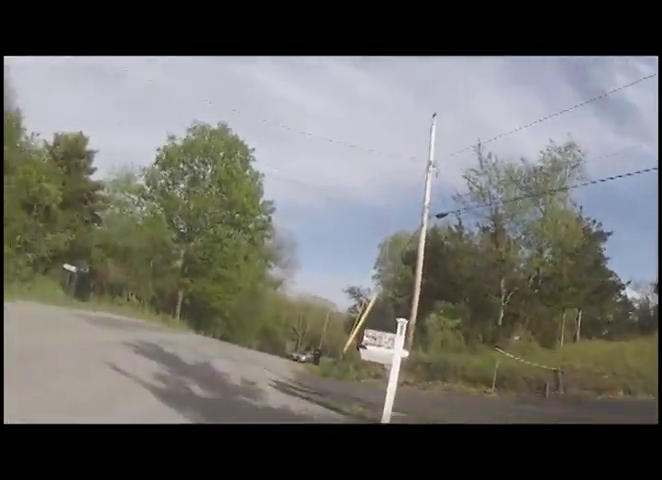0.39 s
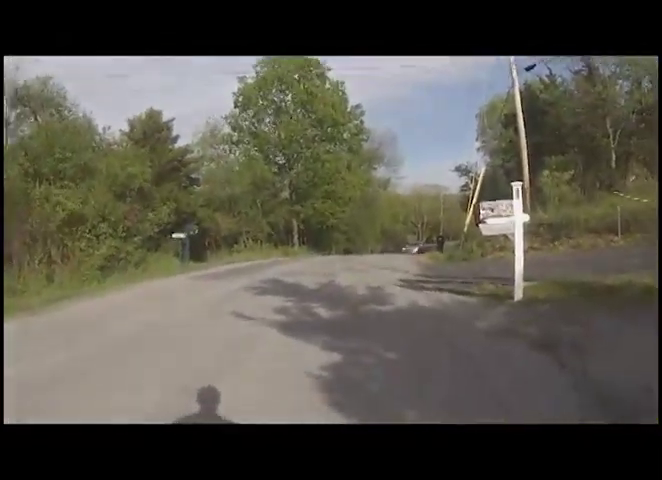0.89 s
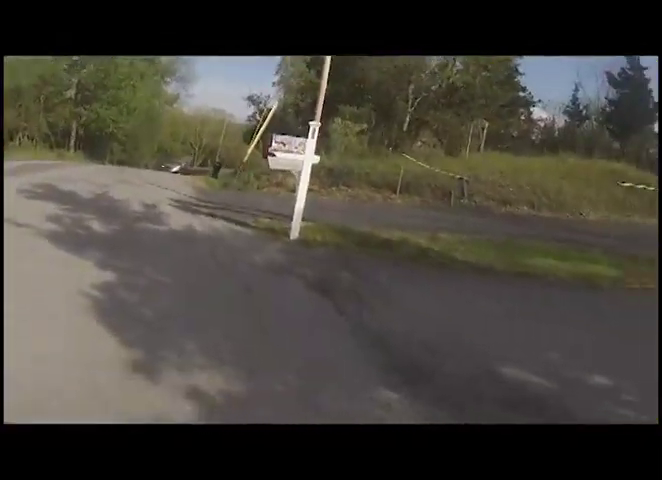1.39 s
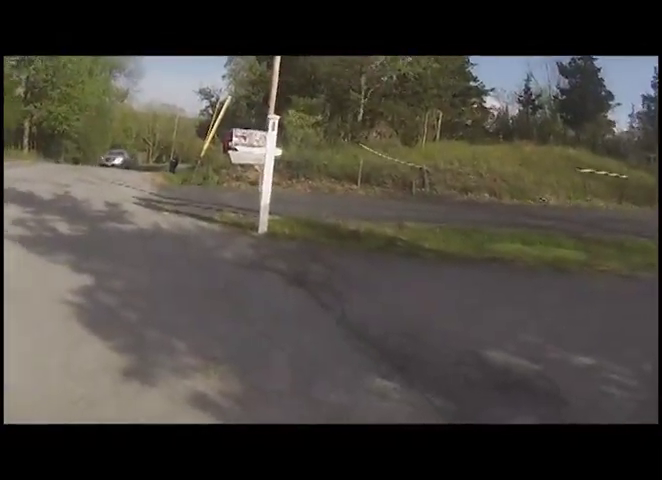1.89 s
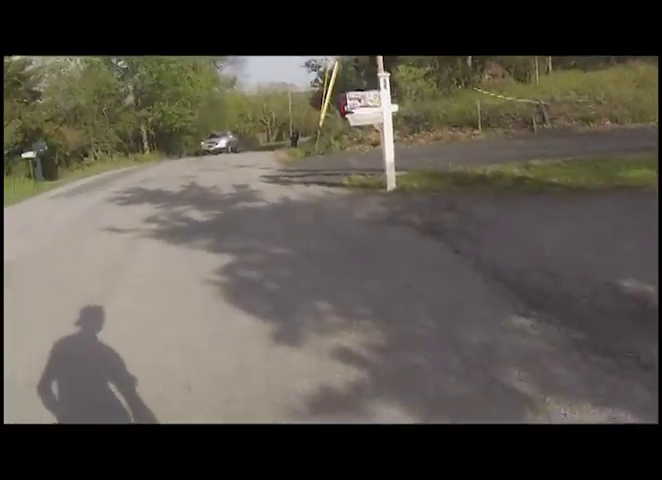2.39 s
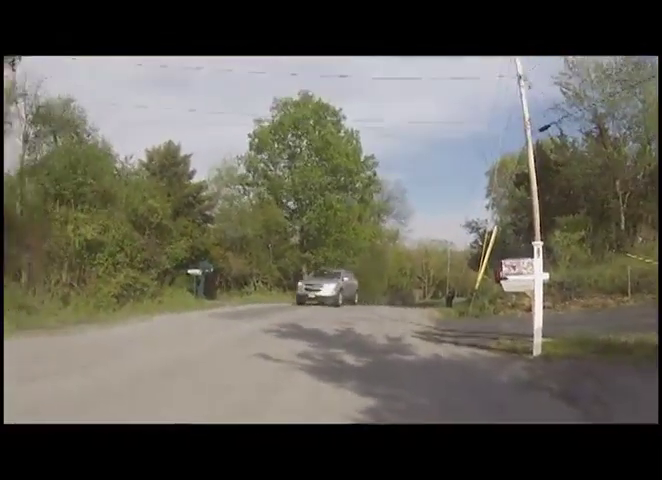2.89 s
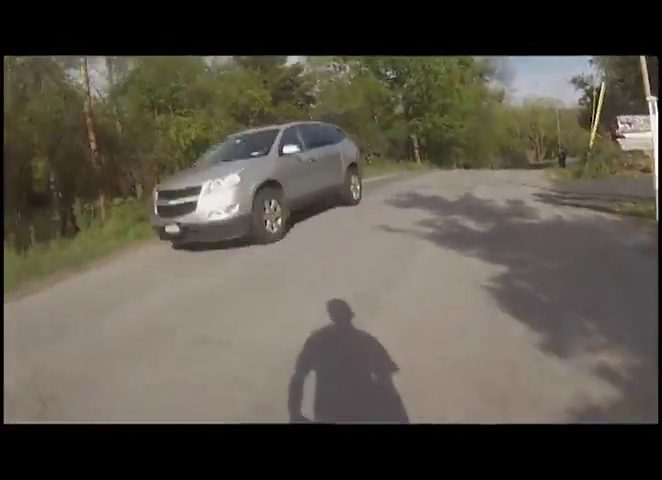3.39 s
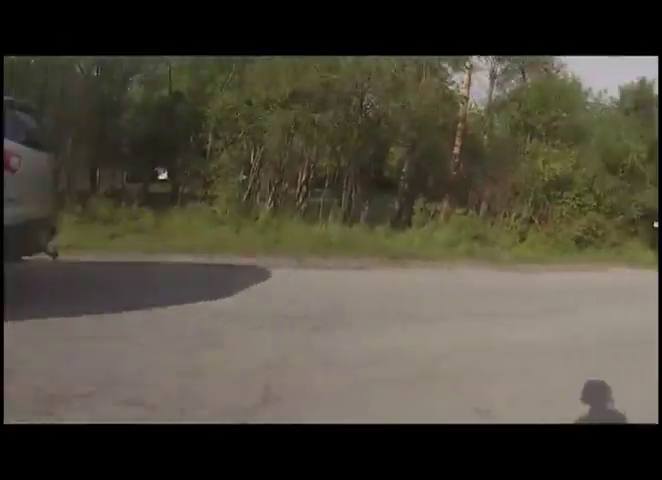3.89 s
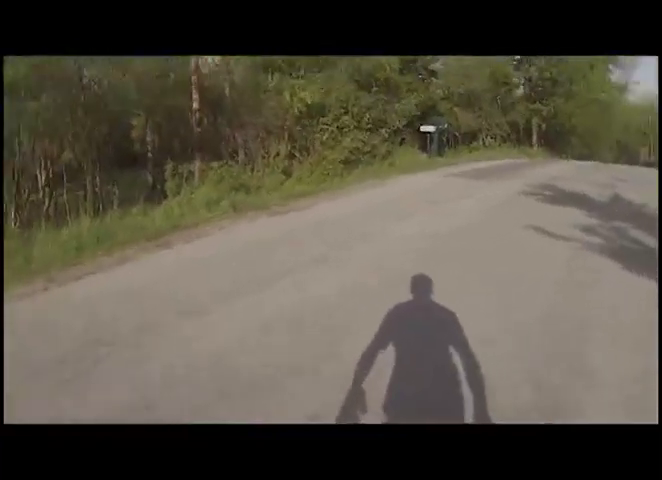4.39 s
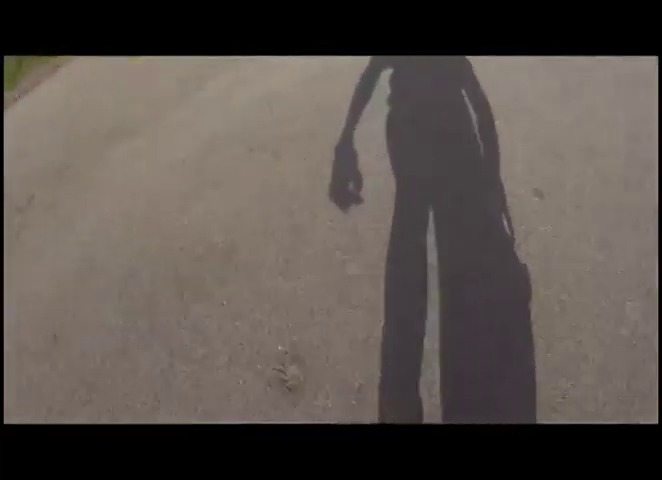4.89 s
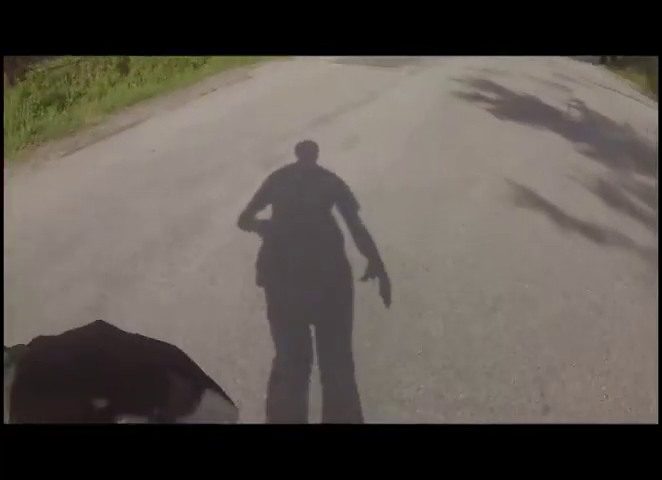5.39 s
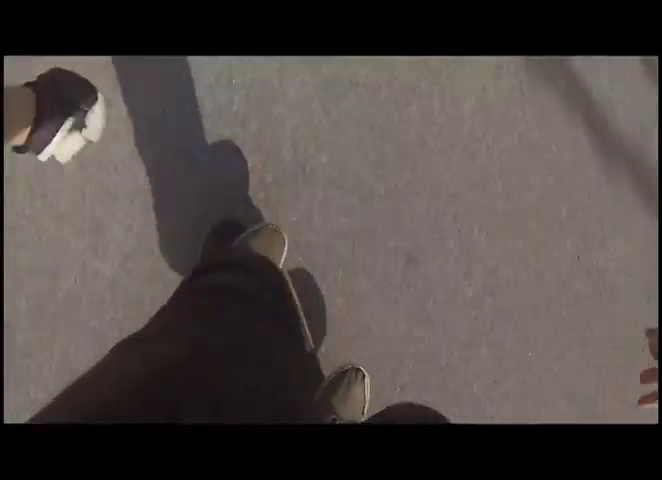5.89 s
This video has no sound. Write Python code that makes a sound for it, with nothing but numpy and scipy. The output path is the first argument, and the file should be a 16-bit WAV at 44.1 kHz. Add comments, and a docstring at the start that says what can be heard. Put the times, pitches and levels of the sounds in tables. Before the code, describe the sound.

Close, rough sound from a small camera in a hard case on a helmet outdoors. Low jolts and rubs come first, then soft regular footfall thuds with small plastic ticks and one sharp loud knock. Everything speeds up and rises in pitch as a car hisses by, a click marks the return to normal pace, then heavy booming jolts, clatter and strap rub finish over faint hiss.

```python
"""Open road: a small camera in a hard case on a skater's helmet.
Footfalls and head moves throw the mount and ring the helmet; knocks ring modes of the case.
Strap rub, road and a passing car's hiss are noise through resonances; scrapes stir them and slips squeak.
Electronics buzz in short tick trains over microphone hiss; a thin far whistle chirps twice.
While the car passes, playback runs fast, which lifts every pitch; a click marks each change of speed."""
import sys
import numpy as np
from scipy import signal
from scipy.fft import rfft, irfft
from scipy.io import wavfile
from scipy.ndimage import uniform_filter1d

SR = 44100
rng = np.random.default_rng(int(sys.argv[2]) if len(sys.argv) > 2 else 0)


def persist_wave(psi):
    """Save psi, clipped to +-1, as 16-bit WAV."""
    counts = np.round(np.clip(psi, -1, 1) * 32767).astype(np.int16)
    wavfile.write(sys.argv[1], SR, np.atleast_2d(counts).T)


def how_loud(loudness_db):
    """Turn decibels into a plain amplitude multiplier (0 dB gives 1, 20 dB gives 10)."""
    steps = np.asarray(loudness_db, float) / 20
    return 10 ** steps


N = 265242

FAST_FROM_S, FAST_TO_S, SPEED = 2.664, 3.827, 2.3
GAIN_S = (FAST_TO_S - FAST_FROM_S) * (SPEED - 1)
LONG = N + int(GAIN_S * SR)  # samples at real pace

# Event times in the tables are as heard.
# Footfalls. Each row: heel strike in seconds, peak level in dB, rocking relative to it in dB.
FOOTFALLS = [(0.492, -31, -4.5), (0.897, -27.5, -2), (1.303, -28, -1), (1.711, -26, -2.5),
             (2.115, -31.5, -2), (2.521, -29.5, -1.5), (2.773, -24, -5.5), (2.948, -24.5, -3.5),
             (3.126, -26, -4), (3.3, -31, -1.5), (3.472, -27, -2.5), (3.643, -33.5, 7), (3.832, -24, -5),
             (4.236, -32.5, 7), (4.636, -28.5, 2.5)]
# Jolts from head moves and the hand. Each row: peak in seconds, peak level in dB, pitch at the peak as heard
# in Hz, direction +-1, helmet ring relative to the level in dB.
HEAD_JOLTS = [(0.019, -17.5, 45, 1, -14), (0.052, -22, 31, 1, -16), (0.072, -14.5, 89, -1, 4.5),
              (0.099, -17.5, 45, 1, -8.5), (0.284, -17, 28, 1, -14.5), (0.367, -22.5, 22.6, -1, -17),
              (0.509, -22, 54.7, 1, -29), (0.732, -29, 30, -1, -32), (0.838, -23, 21.3, -1, -16),
              (1.128, -35.5, 64, 1, -27), (1.497, -34, 35.7, -1, 4.5), (1.817, -36.5, 92, -1, -3),
              (1.937, -37, 71, -1, -3), (2.307, -33, 79, 1, -18), (3.653, -22, 81.5, 1, -9.5),
              (4.273, -24, 43, -1, -26), (4.468, -34, 30, -1, -25), (4.566, -34, 116, -1, -13),
              (4.674, -35.5, 38, -1, 4.5), (4.972, -20, 140, -1, -13), (5.013, -8, 115, 1, -14),
              (5.089, -10, 75, -1, -2.5), (5.266, 3.5, 96.5, 1, -34), (5.277, -2.5, 80, -1, -4),
              (5.297, -11.5, 57, 1, -5.5), (5.33, -18, 23, -1, -5), (5.444, -25, 109, -1, -30),
              (5.703, -24, 58, 1, -20), (5.784, -8, 65, -1, -17), (5.806, -8.5, 24.5, 1, -20)]
# Helmet modes. Each row: mean frequency in Hz, mean relative level in dB, t60 in seconds.
HELMET_MODES = [(114.4, -5, 0.14), (161.3, -14, 0.19), (246, -1.5, 0.043), (312, -11, 0.092)]
# Knocks on the case. Each row: start in seconds, peak level of the middle modes in dB, then thud,
# hollow ring and bright ring relative to it in dB.
CASE_KNOCKS = [(0.0218, -37, -1, -16, 7), (0.0415, -29.5, 6.5, -1, 3), (0.3207, -52.5, 0, -10, 4),
               (0.8264, -44.5, -1, -5, -20), (1.1199, -44, -3, -4, 5.5), (1.3399, -27, -5, -15, -1.5),
               (1.923, -38.5, -7.5, -10, 0.5), (2.1231, -7, -21.5, -17, -7.5), (2.155, -30, -6, -22, 1.5),
               (2.177, -39, 1, -2, -16), (2.2073, -37, -5, -9, 5.5), (2.2977, -43, -9, -13, 5.5),
               (2.386, -44.5, -14, -5, 2), (2.8324, -47, 2, -15, -2), (2.9302, -43.5, -8, -20, -9),
               (2.9874, -37, -4, -7.5, 1.5), (3.258, -36.5, -10, -6.5, 4.5), (4.3804, -50, -1, -15, -6),
               (4.564, -43.5, 0.5, -12, -18), (4.6463, -36, -10, -24, 2.5), (4.7264, -43.5, 0, -17, 5),
               (4.8738, -34, -7, -9, 4.5), (4.9702, -30.5, 5.5, -2, -8), (5.0034, -5.5, 2, -12, -2),
               (5.0111, -23, 8, -15, -22), (5.0811, -36.5, 12.5, -6, 0), (5.2671, -29.5, 3, -9, -1),
               (5.2884, -16, 0, -4, 5.5), (5.3025, -25.5, -13, 8.5, -2), (5.3489, -25.5, -4, -9, -5.5),
               (5.3648, -34, -5, 10, -5), (5.378, -31, -3, -9, -14), (5.4415, -48, -10, -6, -5)]
# Case modes. Each row: mean frequency in Hz, mean relative level in dB, t60 in seconds.
CASE_MODES = [(212.5, -11, 0.059), (288.6, -6.5, 0.056), (420, 4.5, 0.02), (525, 3.5, 0.058),
              (640.4, 3.5, 0.058), (897, -1, 0.025), (1080, -10, 0.015), (1230, 5.5, 0.019),
              (1503, 6, 0.033), (1705, -0.5, 0.023), (1850, -3, 0.009), (1996, 1.5, 0.022),
              (2220, -11.5, 0.042), (2380, -7.5, 0.021), (3240, 7, 0.0052), (3550, -1, 0.018),
              (4020, -1.5, 0.012), (4650, 1, 0.0084), (4810, 12.5, 0.002), (6700, -11, 0.0024),
              (7500, -0.5, 0.0062)]
# Softness of the contact as felt by each mode group, low to high, in samples.
CONTACT_SOFTNESS_SAMPLES = [60, 30, 14, 10, 5]
# Ring-up time constant of each mode group, low to high, in ms.
RING_UP_MS = [4.3, 0.8, 0.3, 0.57, 0.071]
# Head movement. Each row: time in seconds, sway of the mount in dB, creak of the mount in dB, strap rub in dB.
HEAD_MOVES = [(0.0, -15, -51, -47.5), (0.12, -32, -63, -55), (0.54, -46, -64.5, -61.5),
              (0.77, -30.5, -58, -54.5), (1.03, -47.5, -60.5, -66), (1.4, -41, -56.5, -62.5),
              (1.76, -45, -62, -59), (1.95, -53, -64.5, -65.5), (2.2, -36.5, -59, -52),
              (2.4, -43, -65, -76), (3.0, -45, -64, -64), (3.4, -45.5, -61, -58.5),
              (3.8, -38.5, -59.5, -52), (4.39, -38.5, -58.5, -63), (4.66, -39.5, -76, -62),
              (4.85, -36.5, -60, -53.5), (5.0, -25, -57, -38.5), (5.15, -21, -49, -46.5),
              (5.29, -44, -39, -42), (5.47, -32, -52, -62.5), (5.7, -25.5, -44, -43.5),
              (6.01, -31.5, -46, -56)]
# Strap or hand dragged over the case. Each row: start in seconds, length in seconds, level in dB,
# dull share in dB, bright share in dB.
DRAGS = [(0.017, 0.05, -38, -14, -4.5), (0.039, 0.033, -32, -1, -8.5), (0.082, 0.041, -55.5, -4, -9),
         (0.206, 0.062, -44, -16, -17), (0.31, 0.047, -60.5, 2, -2), (1.108, 0.063, -49.5, -19, -21),
         (1.391, 0.057, -53, -25, -13.5), (2.05, 0.075, -60, -9, -1), (2.76, .045, -55, -22, -19),
         (3.137, 0.025, -45.5, -9, -16), (3.162, 0.039, -40.5, -8, -21), (4.222, 0.17, -40, -12.5, -17),
         (4.381, 0.036, -40, -32, -17.5), (4.796, 0.059, -50, 5, -5), (4.87, 0.054, -51, 6, -22),
         (5.028, 0.019, -52, -4, -6), (5.08, 0.047, -48.5, -16, -6), (5.42, 0.055, -44.5, -10, -14),
         (5.702, 0.091, -44.5, -4.5, -6), (5.825, 0.02, -56.5, 12, 3.5), (5.943, 0.082, -45, -6, -13.5)]
# Mount sway resonances. Each row: frequency in Hz, nominal width in Hz, relative level in dB.
SWAY_PEAKS = [(20.56, 11.9, 10), (45, 44, -5.5), (82, 32, -16.5), (150, 89, -27.5)]
# Mount creak resonances. Each row: frequency in Hz, nominal width in Hz, relative level in dB.
CREAK_PEAKS = [(238, 194, 3), (292, 132, -1), (458, 126, -1), (680, 68, 5)]
# Road resonances. Each row: frequency in Hz, nominal width in Hz, relative level in dB.
ROAD_PEAKS = [(620, 580, -12.5), (980, 243, -3.5), (1268, 327, 5), (1410, 81, -1), (1910, 122, -5.5),
              (2620, 840, -17), (3130, 180, -13.5), (4930, 530, -33.5)]
# Strap rub resonances. Each row: frequency in Hz, nominal width in Hz, relative level in dB.
RUB_PEAKS = [(2076, 258, 17.5), (2462, 340, -1)]
# Cloth rustle resonances. Each row: frequency in Hz, nominal width in Hz, relative level in dB.
RUSTLE_PEAKS = [(3585, 560, 20), (4650, 1140, 15), (5900, 4500, -2), (7040, 400, -35), (12000, 4700, -34)]
# Strap slips. Each row: start in seconds, length in seconds, peak level in dB, then start, middle and end in Hz.
STRAP_SLIPS = [(5.504, 0.026, -51, 1450, 1540, 1520), (5.555, 0.081, -44, 1900, 1980, 1940)]
# Tyre hiss as the case passes it. Each row: frequency in Hz, nominal width in Hz, relative level in dB.
TYRE_HISS_PEAKS = [(720, 730, -9), (1240, 354, 0.5), (1451, 124, 5), (2022, 172, 3), (3070, 550, -15),
                   (4930, 2500, -25.5)]
# Far whistle. Each row: start in seconds, length as heard in seconds, peak level in dB.
WHISTLES = [(2.066, 0.1, -60), (3.06, .03, -61)]
# Microphone noise shape. Each row: frequency in Hz, relative level in dB per Hz.
MIC_NOISE = [(150, -17), (700, -3), (2100, -18), (2800, -12), (5200, -15), (7000, -16.5), (9000, -22.5),
             (11000, -18), (12300, -23), (14400, -32), (15300, -46), (20000, -62)]
# Clicks near the changes of speed. Each row: start in seconds, noise gain in dB.
SPEED_CLICKS = [(2.67, -42.5), (3.827, -34)]

STEP_HZ, STEP_HZ_SPREAD, STEP_RING_DB = 49.6, .15, -12  # pitch at real pace
STEP_PUSH_SAMPLES, JOLT_PUSH_SAMPLES = 380, 200  # softness of the push on the helmet
FADE_CYCLES = 0.32
MOUNT_HZ, MOUNT_T60_S, JOLT_ROCK_DB = 18.14, 0.33, -13.5  # slow rocking at real pace
CONTACT_MS, CONTACT_ROUGH = 0.72, 0.68
KNOCK_REF_DB, CRACK_DB, CRACK_PER_DB = -35, -6, -.5  # heavy blows are blunt and crack less
RATTLE_COUNT, RATTLE_MIN_DB, RATTLE_SPREAD_DB = 10, -56, 4
ROAD_UNDER_RUB_DB = -6
RUSTLE_DB, RUSTLE_SLOPE, RUB_REF_DB = -70, 0.97, -60
SWAY_FLICKER_DB, CREAK_FLICKER_DB, RUB_FLICKER_DB, RUSTLE_FLICKER_DB = 2, 2.2, 1.5, 1.5
CAR_PASS_S, CAR_NEAR_S, CAR_AWAY_S = 3.686, 0.61, 0.45  # pass as heard; own distance coming, going
CAR_HISS_DB, CAR_ROAR_DB = -41.5, -54  # when abreast
BUZZ_HZ, BUZZ_WIDTH_HZ, BUZZ_RATE_HZ = 10150, 1600, 450  # band, mean tick rate
BUZZ_FIRST_S, BUZZ_EVERY_S, BUZZ_REST_S = .0375, .1003, (2.1, 3.82)  # rest as heard
BUZZ_LATE_S, BUZZ_LATE_SHARE, BUZZ_TWICE_SHARE = 0.026, .3, 0.29
BUZZ_MEAN_MS, BUZZ_MAX_DB = 22, -50
WHISTLE_HZ, WHISTLE_HARMONICS_DB = 3260, [-3, -4, -6, -7]  # pitch at real pace
MIC_HISS_DB = -66
CEILING = .95


def real_s(s):
    """Time on the road for a moment as heard."""
    return s + np.interp(s, [FAST_FROM_S, FAST_TO_S], [0, GAIN_S])


def speed_at(s):
    """Playback speed at a moment as heard."""
    return SPEED if FAST_FROM_S < s < FAST_TO_S else 1


def level(x, db):
    """Scale to an rms level."""
    return x * how_loud(db) / np.sqrt(np.mean(x ** 2))


def add(out, s, x, peak_db):
    """Mix x in at a moment as heard, at a peak level."""
    i = int(real_s(s) * SR)
    x = x[:LONG - i]
    out[i:i + len(x)] += x * how_loud(peak_db) / np.max(np.abs(x))


def ring(modes, detune, length_s):
    """Decaying sines, slightly detuned and reweighted blow by blow."""
    f, db, t60 = np.transpose(modes)[:, :, None]
    t = np.arange(int(length_s * SR)) / SR
    chance = rng.standard_normal((2, len(modes), 1))
    decay = np.exp(-np.log(1000) * t / t60)
    return how_loud(db + 1.5 * chance[0]) * decay * np.sin(2 * np.pi * f * (1 + detune * chance[1]) * t)


def throw(out, s, db, hz, way, ring_db, rock_db, push_samples):
    """The mount swings to a sharp peak and back ever slower, rocks, and rings the helmet through a soft push."""
    t = np.arange(-.02 * SR, .25 * SR) / SR
    turns = hz * t / (1 + 26.0 * np.maximum(t, 0))
    size = np.where(t < 0, np.exp(-(turns / 0.29) ** 2), np.exp(-turns / FADE_CYCLES - t / 0.14))
    # stretched ahead of the fast playback, which restores its pace
    swing = signal.resample(np.cos(2 * np.pi * turns) * size, int(len(t) * speed_at(s)))
    swing = np.convolve(swing, np.hanning(81), "same")  # rounds the sharp peak
    after = t[t > 0]
    rock = np.sin(2 * np.pi * MOUNT_HZ * after) * np.exp(-np.log(1000) * after / MOUNT_T60_S)
    rock = rock * np.tanh(after / 0.014)
    helmet = signal.fftconvolve(ring(HELMET_MODES, 0.12, 0.11).sum(0), np.hanning(push_samples))
    add(out, max(s - .02, 0), np.sign(way) * swing, db)
    add(out, s, -np.sign(way) * rock, db + rock_db)
    add(out, max(s - .009, 0), helmet, db + ring_db)


def footfalls():
    """Each heel strike throws the mount downward at a slightly varying pitch."""
    out = np.zeros(LONG)
    for s, db, rock_db in FOOTFALLS:
        hz = STEP_HZ * (1 + STEP_HZ_SPREAD * rng.uniform(-0.41, 1)) * speed_at(s)
        throw(out, s, db, hz, -1, STEP_RING_DB, rock_db, STEP_PUSH_SAMPLES)
    return out


def head_jolts():
    """Head moves and the hand throw the mount either way, each at its own pitch."""
    out = np.zeros(LONG)
    for row in HEAD_JOLTS:
        throw(out, *row, JOLT_ROCK_DB, JOLT_PUSH_SAMPLES)
    return out


def strike(out, s, db, thud_db, hollow_db, bright_db):
    """A few ms of rough contact ring five groups of case modes, each with its own share."""
    crack_db = bright_db + CRACK_DB + CRACK_PER_DB * (db - KNOCK_REF_DB)
    t = np.arange(int(0.015 * SR)) / SR
    contact = CONTACT_ROUGH * rng.standard_normal(len(t)) * np.exp(-t * 1000 / CONTACT_MS) / 4
    contact[0] = 1  # a firm first touch, then chatter
    modes = ring(CASE_MODES, .02, .08)
    group = np.digitize(np.array(CASE_MODES)[:, 0], [500, 750, 1750, 2800])
    for k, share_db in enumerate([thud_db, hollow_db, 0, bright_db, crack_db]):
        push = np.convolve(contact, np.hanning(CONTACT_SOFTNESS_SAMPLES[k] + 2))
        members = modes[group == k]
        body = members[::2].sum(0) - members[1::2].sum(0)  # neighbours move in opposite senses
        body = body * (1 - np.exp(-np.arange(len(body)) * 1000 / SR / RING_UP_MS[k]))
        add(out, s, signal.fftconvolve(body, push), db + share_db)


def knocks():
    """Blows ring the case; where each lands sets the shares of its mode groups."""
    out = np.zeros(LONG)
    for row in CASE_KNOCKS:
        strike(out, *row)
    return out


def rattle():
    """Small loose ticks at random moments ring the same case modes."""
    out = np.zeros(LONG)
    for when, size, bright in rng.random((RATTLE_COUNT, 3)):
        db = RATTLE_MIN_DB + RATTLE_SPREAD_DB * size
        strike(out, when * (N / SR - .1), db, -8, -8, 12 * bright - 6)
    return out


def walk(rate_hz):
    """Random levels, a new one every 1 / rate_hz s, slewed in between."""
    k = int(SR / rate_hz)
    return 2.32 * uniform_filter1d(np.repeat(rng.standard_normal(LONG // k + 1), k), k)[:LONG]


def coloured(peaks, grit_db, flicker_db, rate_hz):
    """Grainy noise through resonances applied twice; they flicker together and a little apart."""
    grit = how_loud(grit_db * np.minimum(rng.exponential(size=LONG), 6.5))
    spectrum = rfft(rng.standard_normal(LONG) * grit)
    hz = np.fft.rfftfreq(LONG, 1 / SR) + 1e-9
    shared = walk(rate_hz)
    out = 0
    for f, width, db in peaks:
        shape = 1 / (1 + 1j * (hz / f - f / hz) * f / (1.485 * width)) ** 2
        flicker = 2 * np.tanh((shared + 0.47 * walk(rate_hz)) / 2)  # bounded
        out = out + how_loud(db + flicker_db * flicker) * irfft(spectrum * shape, LONG)
    return level(out, 0)


def drag(column):
    """Gain of the scrapes for one layer: each bites quickly, holds and lets go."""
    gain = np.zeros(LONG)
    for row in DRAGS:
        a = int(real_s(row[0]) * SR)
        b = min(int(real_s(row[0] + row[1]) * SR), LONG)
        share_db = row[column] if column else 0
        shape = np.interp(np.linspace(0, 1, b - a), [0, .12, .4, .8, 1], [0.46, 0.45, 1.07, 0.8, 0.047])
        gain[a:b] += how_loud(row[2] + share_db) * shape
    return uniform_filter1d(gain, size=60)


def rubbing():
    """Head movement drives mount, strap, road and cloth resonances; scrapes stir all but the sway."""
    s, *columns = np.transpose(HEAD_MOVES)
    t = np.arange(LONG) / SR
    sway_db, creak_db, rub_db = (np.interp(t, real_s(s), c) for c in columns)
    dull = drag(column=3)
    creak = how_loud(creak_db) + how_loud(-5.5) * dull
    road = how_loud(rub_db + ROAD_UNDER_RUB_DB) + dull
    rub = how_loud(rub_db) + drag(column=0)
    rustle = how_loud(RUSTLE_DB + RUSTLE_SLOPE * (rub_db - RUB_REF_DB)) + drag(column=4)
    out = how_loud(sway_db) * coloured(SWAY_PEAKS, 0, SWAY_FLICKER_DB, 8.6)
    out = out + creak * coloured(CREAK_PEAKS, 3.03, CREAK_FLICKER_DB, 25)
    out = out + road * coloured(ROAD_PEAKS, 0, 0.43, 10)
    out = out + rub * coloured(RUB_PEAKS, 1.2, RUB_FLICKER_DB, 40)
    return out + rustle * coloured(RUSTLE_PEAKS, 4.3, RUSTLE_FLICKER_DB, 35)


def squeaks():
    """The strap slips: a thin tone glides on a parabola through three pitches."""
    out = np.zeros(LONG)
    for s, length_s, db, *hz in STRAP_SLIPS:
        u = np.linspace(0, 1, int(length_s * SR))
        pitch = np.polyval(np.polyfit([0, .5, 1], hz, 2), u)
        add(out, s, np.sin(2 * np.pi * np.cumsum(pitch) / SR) * np.sin(np.pi * u), db)
    return out


def car():
    """Even tyre hiss and low roar swell and fall with distance, the roar more steeply."""
    since = np.arange(LONG) / SR - real_s(CAR_PASS_S)
    near = 1 / np.hypot(1, since / np.where(since < 0, CAR_NEAR_S, CAR_AWAY_S))
    hiss = how_loud(CAR_HISS_DB) * near ** 1.5 * coloured(TYRE_HISS_PEAKS, 0, 0.95, 25)
    roar = how_loud(CAR_ROAR_DB) * near ** 2.2 * coloured(CREAK_PEAKS, 0, 0.95, 25)
    return hiss + roar


def buzz():
    """Short irregular trains of electrical ticks in a high band, some late or doubled, with a rest."""
    out = np.zeros(LONG)
    ticks = (rng.random(LONG) < BUZZ_RATE_HZ / SR) * rng.standard_normal(LONG)
    band = [BUZZ_HZ - BUZZ_WIDTH_HZ / 2, BUZZ_HZ + BUZZ_WIDTH_HZ / 2]
    train = signal.sosfilt(signal.butter(3, band, "bandpass", fs=SR, output="sos"), ticks)
    clock = np.arange(BUZZ_FIRST_S, LONG / SR - .1, BUZZ_EVERY_S)
    for s, (late, twice, size, long) in zip(clock, rng.random((len(clock), 4))):
        if real_s(BUZZ_REST_S[0]) < s < real_s(BUZZ_REST_S[1]):
            continue
        starts = [BUZZ_LATE_S * (late < BUZZ_LATE_SHARE)]
        if twice < BUZZ_TWICE_SHARE:
            starts = [0, BUZZ_LATE_S]
        for i in ((s + np.array(starts)) * SR).astype(int):
            burst = train[i:i + int(BUZZ_MEAN_MS * (.7 + .6 * long) * SR / 1000)]
            gain = how_loud(BUZZ_MAX_DB - 6 * size) / np.max(np.abs(burst))
            out[i:i + len(burst)] += burst * signal.windows.tukey(len(burst), .2) * gain
    return out


def whistle():
    """Four harmonics at a steady pitch, switched softly on and off."""
    out = np.zeros(LONG)
    for s, length_s, db in WHISTLES:
        t = np.arange(int(length_s * speed_at(s) * SR)) / SR
        tone = sum(how_loud(d) * np.sin(2 * np.pi * (k + 1) * WHISTLE_HZ * t)
                   for k, d in enumerate(WHISTLE_HARMONICS_DB))
        add(out, s, tone * signal.windows.tukey(len(t), .4), db)
    return out


def microphone_hiss():
    """Steady noise shaped by the microphone's own spectrum."""
    hz = np.fft.rfftfreq(LONG, 1 / SR) + 1
    shape_hz, shape_db = np.transpose(MIC_NOISE)
    shape = how_loud(np.interp(np.log(hz), np.log(shape_hz), shape_db))
    return level(irfft(rfft(rng.standard_normal(LONG)) * shape, LONG), MIC_HISS_DB)


def squeeze(x):
    """Resample the middle stretch to fewer samples: faster and higher; blend its ends to avoid steps."""
    a, b = int(FAST_FROM_S * SR), int(FAST_TO_S * SR)
    end = b + LONG - N
    fast = signal.resample(x[a:end], b - a)
    i = np.arange(b - a)
    fade = np.minimum(1, np.minimum(i, i[::-1]) / 90)
    ramp = np.linspace(x[a], x[end], b - a)
    return np.concatenate([x[:a], fast * fade + ramp * (1 - fade), x[end:]])


def speed_clicks():
    """Forty-sample bursts of smoothed noise where the speed changes."""
    out = np.zeros(N)
    for s, db in SPEED_CLICKS:
        noise = np.convolve(rng.standard_normal(38), [.5, 1, .5])
        out[int(s * SR):][:40] += how_loud(db) * noise * np.hanning(40)
    return out


def scene():
    """Mix all sources at real pace, squeeze the middle stretch, add the clicks."""
    x = footfalls() + head_jolts() + knocks() + rattle() + rubbing() + squeaks()
    x = x + car() + buzz() + whistle() + microphone_hiss()
    return (squeeze(x) + speed_clicks())[None]


def top_cut(x):
    """Nothing passes above the cut-off."""
    return signal.sosfilt(signal.butter(12, 15800, fs=SR, output="sos"), x)


def record(dry):
    """The input stage rounds the loudest jolts."""
    rounded = CEILING * np.tanh(dry / CEILING)
    return top_cut(rounded)


dry = scene()
out = record(dry)
persist_wave(out)
```